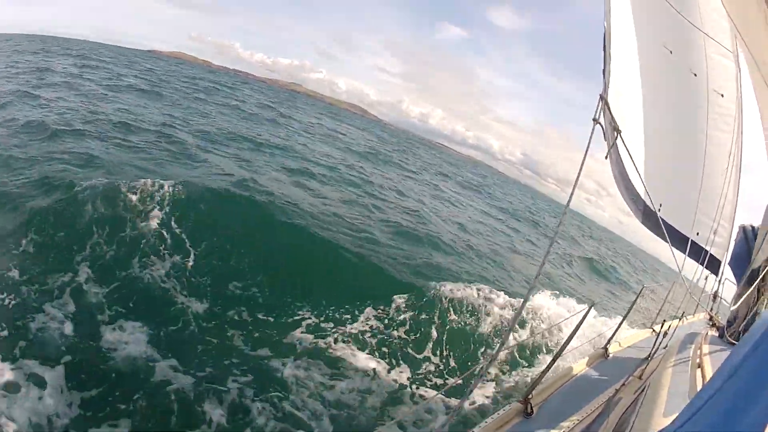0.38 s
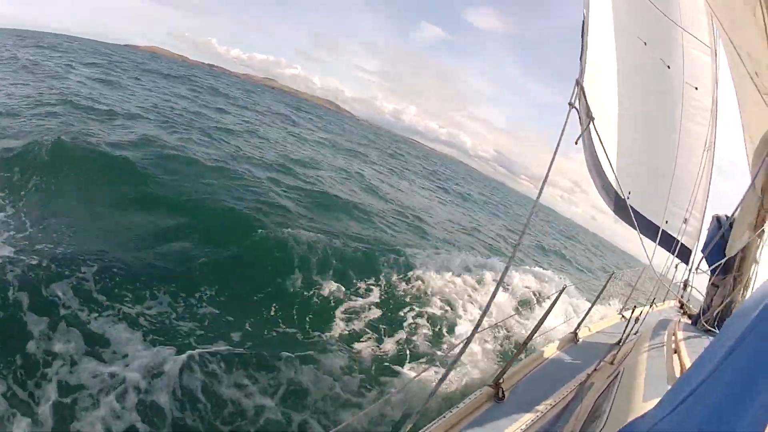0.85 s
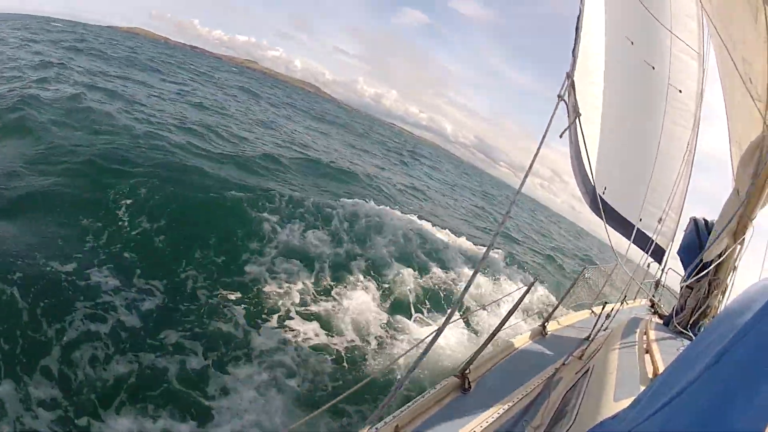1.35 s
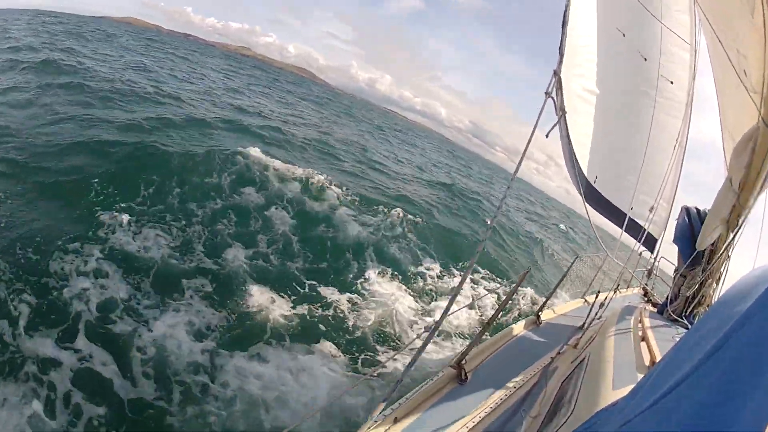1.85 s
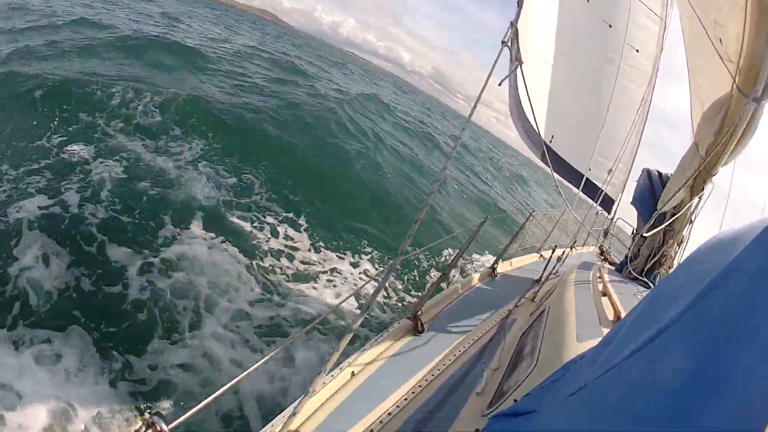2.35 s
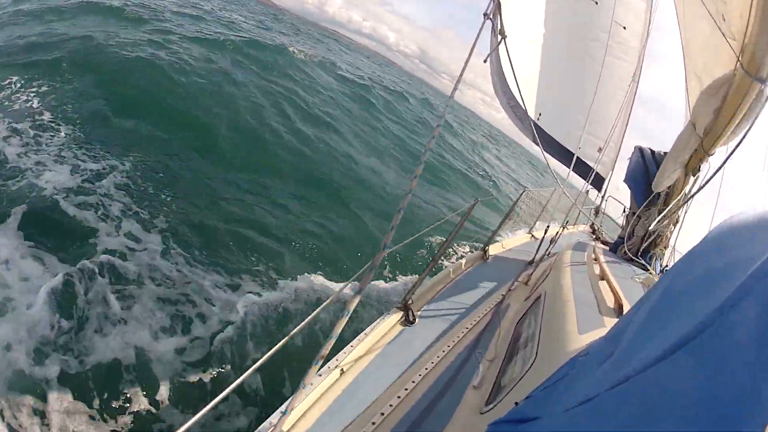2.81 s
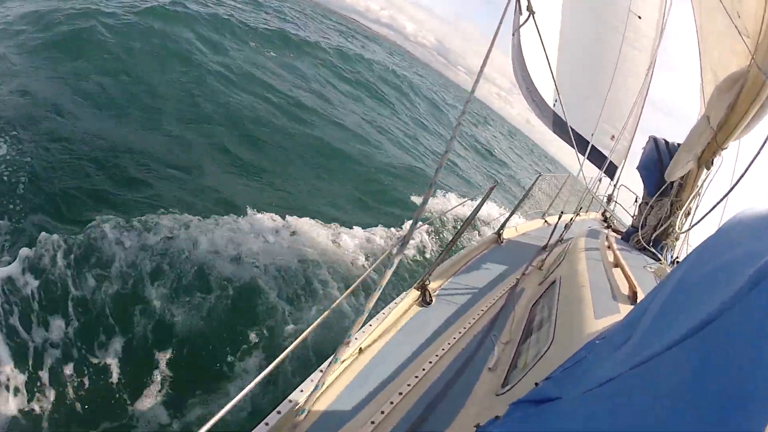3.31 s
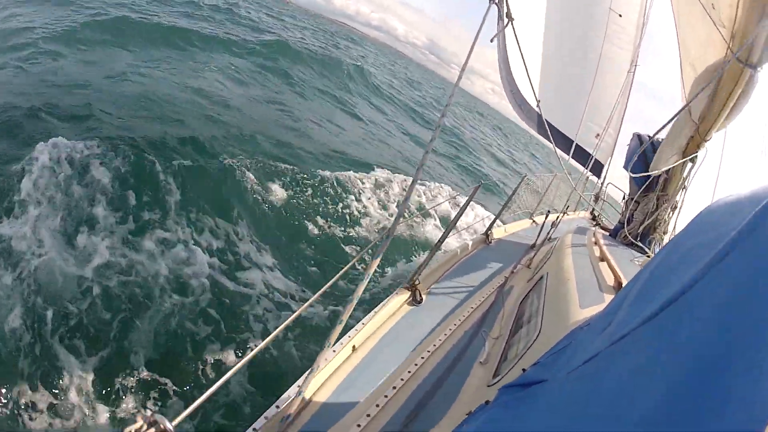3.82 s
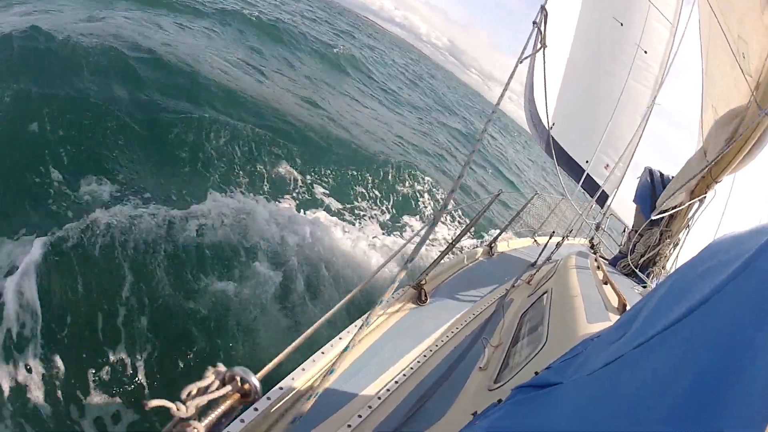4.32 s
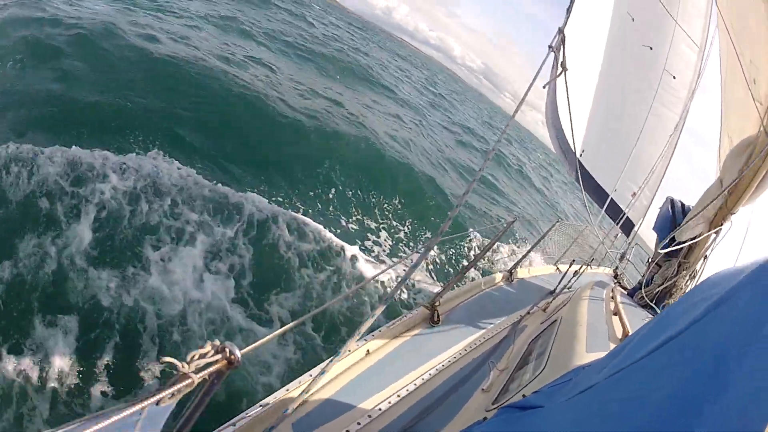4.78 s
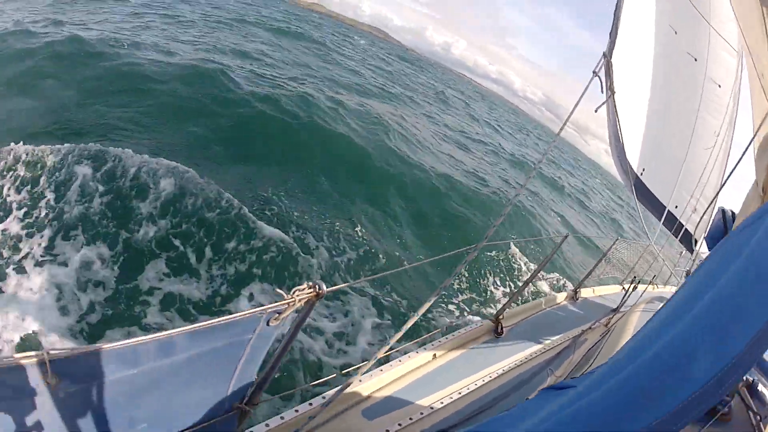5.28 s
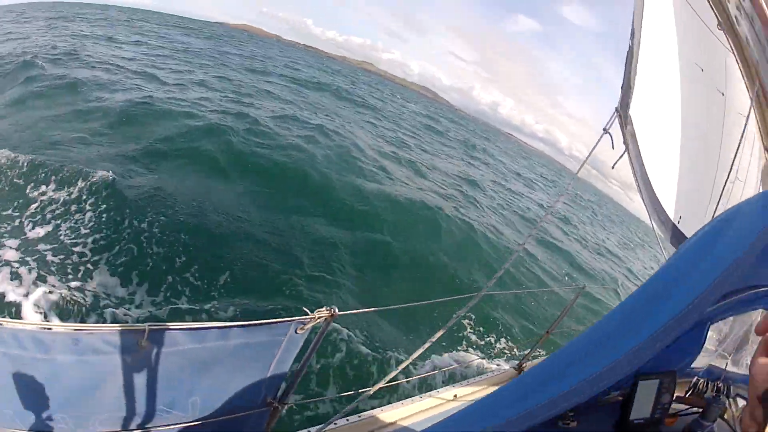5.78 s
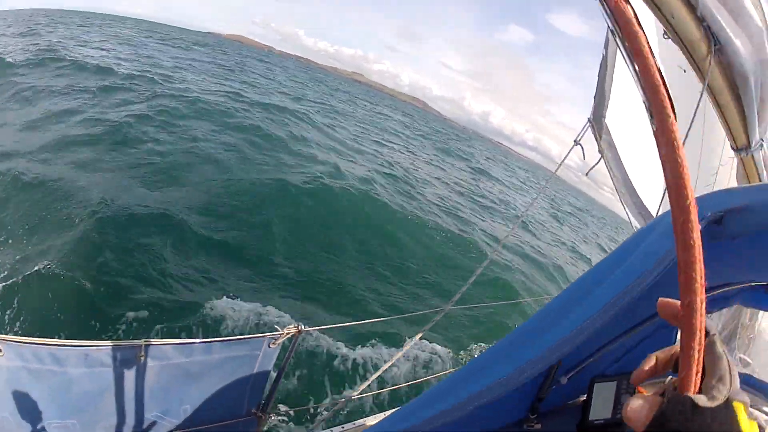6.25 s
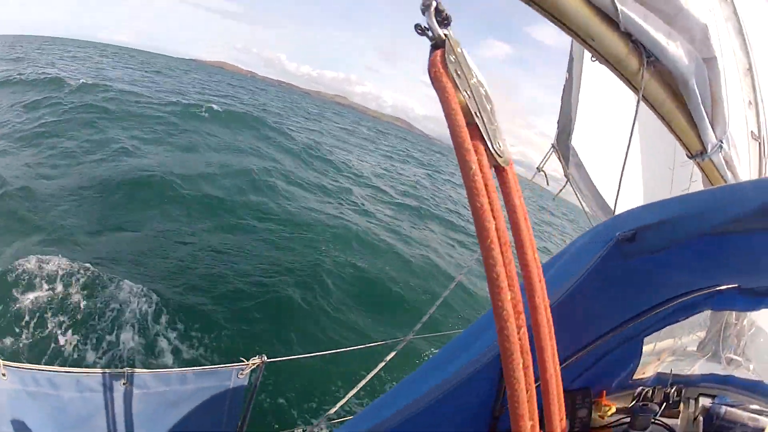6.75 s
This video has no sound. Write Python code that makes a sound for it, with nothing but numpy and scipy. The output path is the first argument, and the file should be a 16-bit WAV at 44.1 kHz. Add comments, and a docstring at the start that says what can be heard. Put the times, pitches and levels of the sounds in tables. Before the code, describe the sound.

Close plastic knocks dominate a dull bed of fizzing water and low wind buffeting beside a moving sailboat. Soft bumps and scraping come first, then two strong clacks, a lull of faint rubbing, a quick clattering run of blows, and sparser single raps, the last ones brighter. The microphone is boxed in, so the sea sounds distant and boxy, with a little gritty treble edge on the knocks.

```python
"""Over the side of a sailboat in choppy water, heard by a hand-held camera in a sealed plastic case.
Foam hisses dully through the case wall and wind buffets it: both are noise shaped in pitch and time.
Fingers and the loose mount rub, and the mount knocks and rattles as the boat pitches: clicks and
blows set the case ringing. Faint narrow streaks of hiss, fuzzy in pitch, come and go.
The converter holds each sample for 1/12000 s, which mirrors the sound about 12 kHz."""
import sys
import numpy as np
from scipy import signal
from scipy.fft import rfft, irfft
from scipy.io import wavfile
from scipy.ndimage import uniform_filter1d

SR = 44100
rng = np.random.default_rng(int(sys.argv[2]) if len(sys.argv) > 2 else 0)


def file_out(sig):
    """Save sig as 16-bit WAV at sys.argv[1]."""
    # one column per channel
    cols = np.atleast_2d(sig).T
    # limit, then scale
    lim = np.clip(cols, -1, 1)
    pcm = np.round(lim * 32767).astype(np.int16)
    wavfile.write(sys.argv[1], SR, pcm)


def how_loud(loudness_db):
    """Turn decibels into a plain amplitude multiplier (0 dB gives 1, 20 dB gives 10)."""
    steps = np.asarray(loudness_db, float) / 20
    return 10 ** steps


N = 303492  # samples, about 6.9 s

# how strongly the foam hisses, before a common lift: [t/s, level/dB]
FOAM_LEVEL = [(0.0, -61.5), (1.07, -58), (1.63, -61.5), (2.01, -61), (2.18, -61), (2.78, -61),
              (3.31, -55.5), (3.54, -59), (3.81, -62), (4.27, -57), (4.52, -59.5), (5.27, -62),
              (6.36, -61.5), (6.48, -59.5), (6.88, -62)]
# colour of the foam through the case wall: [f/Hz, relative level/dB per Hz]
FOAM_COLOUR = [(150, -41), (250, 0.5), (431, -5.5), (526, -21.5), (669, -18.5), (838, -15.5), (1170, -13.5),
               (1530, -20), (1960, -10.5), (2180, -10), (2600, -4.5), (3170, -17), (3480, -11.5),
               (4080, -16.5), (6000, -32.5), (7800, -79), (13200, -120)]
# how strongly the wind buffets the case: [t/s, level/dB]
WIND_LEVEL = [(0.0, -55), (0.17, -52), (0.4, -58), (.75, -55), (1.11, -46.5), (1.48, -48.5), (1.68, -49),
              (1.8, -47.5), (2.24, -49), (2.49, -49.5), (2.74, -49), (3.18, -46.5), (3.41, -57),
              (3.53, -47), (4.06, -49.5), (4.37, -49.5), (4.87, -47), (5.25, -56.5), (5.44, -46),
              (5.7, -56.5), (6.5, -50), (6.88, -56)]
# colour of the buffeting: [f/Hz, relative level/dB per Hz]
WIND_COLOUR = [(15, -3.5), (35, 3.5), (60, -10.5), (120, -10), (300, -32), (450, -24), (700, -66),
               (1500, -46)]
# fingers and mount rubbing on the case: [t/s, wall level/dB]; the body follows
GRIP_LEVEL = [(0.0, -71.5), (.3, -64), (.65, -63), (.95, -64.5), (1.3, -54.5), (1.57, -68), (1.8, -60),
              (2.1, -64), (2.64, -67), (3.13, -63.5), (3.4, -66), (4.0, -67), (4.35, -63.5), (4.9, -66),
              (5.15, -70), (5.8, -68), (6.42, -65), (6.88, -68)]
# longer scrapes: [start t/s, end t/s]
SCRAPE_TIMES = [(.56, .8), (.985, 1.205), (1.7, 2.4), (4.55, 4.95)]
# strength of those scrapes, in the same order: [wall level/dB, body level/dB]
SCRAPE_LEVELS = [(-75, -52), (-53.5, -57), (-87, -67), (-78, -63.5)]
# ways the case rings, in groups: body, wall, lid, crack, side, shove on the arm, snap
# [f/Hz, level within the group/dB, time to fall by 60 dB/s, first swing +1 or -1]
CASE_MODES = [
    [(172, 0, .055, 1), (270, -14, .02, -1)],
    [(535, 0, .04, -1)],
    [(925, -6, .028, 1), (1175, 0, .024, 1), (780, -9, .012, 1)],
    [(1570, -12, .012, -1), (2250, 0, .014, -1), (2650, 0, .012, -1)],
    [(320, -3, .022, 1), (455, 0, .035, 1)],
    [(50, -3, .1, -1), (85, 0, .07, 1)],
    [(3150, -11, .007, 1), (3620, 0, .011, -1), (4050, -1, .010, -1)],
]
# knocks on the case: [t/s, blow level/dB, hardness (0 thud, 1 rap),
# mount chatter against the blow/dB, shove against the blow/dB]
BLOWS = [(0.099, -42.5, 0.45, -9, -15), (0.318, -55.5, 1.2, 13, -14), (0.554, -38, 0, -34, 2.5),
         (0.591, -40, 0.11, -30, -8), (0.608, -36, 0.28, -31, -27), (0.633, -30, 0.059, -30, -15),
         (0.699, -43, .2, -23, -16), (0.714, -39, .2, -20, -14), (0.744, -40, 0.41, -23, -16),
         (0.763, -45, .4, -14, -5), (0.986, -33.5, 0.29, -23, -4), (1.135, -25.5, 0.15, -11, -12),
         (1.313, -11, 1, -0.5, -7), (1.465, -15.5, 0.51, -38, -20), (1.477, -15.5, 0.51, -21, -7.5),
         (2.247, -39.5, 0, -20, -10), (2.361, -34, 0, -31, -13), (2.692, -41.5, 0.64, -14, -5),
         (2.801, -38, 0, -17, -20), (2.941, -20, 0.44, -25, -21), (2.967, -22, 0.48, -36, -10.5),
         (3.149, -15, 0.92, -11, -14), (3.18, -28.5, 0.37, -25, -14), (3.209, -19, .55, -30, -22),
         (3.231, -21, 0.77, -16, -30), (3.253, -16.5, .5, -18, -36), (3.279, -22.5, 0.44, -28, -22),
         (3.3, -15.5, .5, -20, -9), (3.314, -17, .5, -33, -14), (3.329, -20, 0.81, -22, -15),
         (4.183, -16, 0.58, -11.5, -10.5), (4.859, -35.5, 0.44, -22, -8), (4.913, -42, 0.77, -19, -0.5),
         (5.27, -48, 1.4, 16.5, -2), (5.398, -18.5, 0.97, -5.5, -4.5), (5.451, -29, 0.62, -13, -14),
         (5.482, -30.5, 0.37, -12.5, -15), (6.221, -41.5, .1, -19, -11), (6.373, -45.5, 0.46, -16, -11),
         (6.456, -19, 1.37, 8, -4.5), (6.567, -39.5, 0.44, -9, -2)]
# harder blows reach higher modes: [hardness, then against the blow: wall/dB, lid/dB, side/dB]
HARDNESS_REACH = [(0, -34, -32, -18), (.3, -15.5, -19.5, -14), (.5, -8.5, -13.5, -6.5),
                  (.8, -5.5, -9.5, -4), (1.2, -3.5, 5, 9.5)]
# faint narrow streaks of hiss, fuzzy in pitch: [start t/s, end t/s, f/Hz, level/dB]
STREAK_LIST = [(2.054, 2.135, 2440, -61), (2.248, 2.335, 2400, -62), (2.338, 2.41, 2700, -62),
               (2.394, 2.64, 3600, -70), (2.5, 2.623, 2480, -72), (3.673, 3.956, 3540, -68.5),
               (5.014, 5.11, 2330, -66), (5.5, 6.0, 2624, -74), (6.665, 6.87, 2636, -62)]


def evened(x):
    """Scales a signal to an average strength (rms) of 1."""
    return x / np.sqrt(np.mean(x ** 2) + 1e-20)


def curve(rows):
    """Draws straight lines between the (time, value) points of a table."""
    times, values = np.transpose(rows)
    return np.interp(np.arange(N) / SR, times, values)


def smoothed_field(field, bins, frames):
    """Blurs a random field over pitch and time, then evens its strength."""
    over_pitch = uniform_filter1d(field, size=bins, axis=0)
    return evened(uniform_filter1d(over_pitch, size=frames, axis=1))


def noise(spectrum, size, patchy_db, swell_db, flicker_db):
    """Random short-time spectra with brief patches, long narrow swells and a flicker shared by all bins."""
    frames = 4 * N // size + 5
    hz = np.fft.rfftfreq(size, 1 / SR)
    real, imaginary, patches, swells = rng.standard_normal((frames, len(hz), 4)).T
    swells = smoothed_field(swells, bins=4, frames=40)
    patches = smoothed_field(patches, bins=5, frames=9)
    flicker = evened(uniform_filter1d(rng.standard_normal(frames), size=3))
    table_hz, table_db = np.transpose(spectrum)
    colour_db = np.interp(np.log(hz + 1), np.log(table_hz + 1), table_db)[:, None]
    field_db = colour_db + patchy_db * patches + swell_db * swells + flicker_db * flicker
    spectra = (real + 1j * imaginary) * how_loud(field_db)
    sound = signal.istft(spectra, nperseg=size, noverlap=3 * size // 4)[1]
    return evened(sound[:N])


def foam():
    """Dense fizz of bursting bubbles, coloured by the case; narrow bands swell as foam slides past."""
    lift_db = 2.5
    fizz = noise(FOAM_COLOUR, size=1024, patchy_db=0.55, swell_db=2.27, flicker_db=0.85)
    return how_loud(curve(FOAM_LEVEL) + lift_db) * fizz


def wind():
    """Lumpy low pressure of moving air on the case."""
    buffeting = noise(WIND_COLOUR, size=2048, patchy_db=1.0, swell_db=1.0, flicker_db=0.5)
    return how_loud(curve(WIND_LEVEL)) * buffeting


def ring(modes):
    """A struck group of modes: sine waves that die away, added up and scaled to a peak of 1."""
    t = np.arange(SR // 5) / SR
    sound = np.zeros(len(t))
    for hz, db, t60, sign in modes:
        sound += sign * how_loud(db - 60 * t / t60) * np.sin(2 * np.pi * hz * t)
    return sound / abs(sound).max()


def rub():
    """Uneven stick-slip clicks shake the body, wall and lid modes."""
    clicks_per_s = np.array([[300], [1500]])  # body, wall; on average
    lid_db, body_over_wall_db, scrape_edge_s = -4.5, -0.5, .015
    slips = rng.standard_normal((2, N)) * (rng.random((2, N)) < clicks_per_s / SR)
    wall_and_lid = ring(CASE_MODES[1]) + how_loud(lid_db) * ring(CASE_MODES[2])
    body = evened(signal.oaconvolve(slips[0], ring(CASE_MODES[0]))[:N])
    wall = evened(signal.oaconvolve(slips[1], wall_and_lid)[:N])
    t = np.arange(N) / SR
    wall_level = how_loud(curve(GRIP_LEVEL))
    body_level = how_loud(body_over_wall_db) * wall_level
    for (start, end), (wall_db, body_db) in zip(SCRAPE_TIMES, SCRAPE_LEVELS):
        scraping = np.clip(np.minimum(t - start, end - t) / scrape_edge_s, 0, 1)
        wall_level += how_loud(wall_db) * scraping
        body_level += how_loud(body_db) * scraping
    return wall_level * wall + body_level * body


def mount_chatter():
    """The loose mount rattles for a few ms at each blow: a short random burst of force, total energy 1."""
    t = np.arange(SR // 100) / SR
    bursts = rng.standard_normal((len(BLOWS), len(t))) * t * np.exp(-t / .0006)
    return bursts / np.linalg.norm(bursts, axis=1, keepdims=True)


def knocks():
    """Each blow strikes all mode groups; the mount's chatter sounds the crack and snap modes."""
    turn_s = 5.1  # the camera swings round and blows then land on its side
    facing_db = -43.5  # the side modes before that, against the blow
    contacts_s = .0007, .001, .0005, .0002, .001, .003, .00019  # rough push length for each group
    low_cut_hz = 95
    out = np.zeros((len(CASE_MODES), N))
    chatter = mount_chatter()
    hardness, *reach = np.transpose(HARDNESS_REACH)
    for group, contact_s in enumerate(contacts_s):
        forces = np.zeros(N)
        for (s, blow_db, hard, crack, shove), rattle in zip(BLOWS, chatter):
            wall, lid, side = (np.interp(hard, hardness, db) for db in reach)
            side = side if s > turn_s else facing_db
            snap = crack + .5 * min(crack, 0) - 1.5  # soft chatter loses the snap first
            share_db = (0, wall, lid, crack, side, shove, snap)[group]
            force = rattle if group in (3, 6) else np.ones(1)  # crack and snap
            forces[round(s * SR):][:len(force)] += how_loud(blow_db + share_db) * force
        push = np.hanning(round(contact_s * SR) + 3)
        struck = np.convolve(ring(CASE_MODES[group]), push / push.sum())
        out[group] = signal.oaconvolve(forces, struck)[:N]
    shove = out[5]  # it moves the whole camera and is felt in full
    rest = out.sum(axis=0) - shove
    # the knocks lose their slowest pressure, so the rebound swings wider than the first push
    return shove + signal.lfilter(*signal.butter(2, low_cut_hz, "high", fs=SR), rest)


def streaks():
    """Each streak is a narrow band of noise that fades in and out."""
    out = np.zeros(N)
    for start, end, hz, db in STREAK_LIST:
        t = np.arange(round((end - start) * SR)) / SR
        waver = rng.standard_normal((2, SR))
        for _ in range(2):  # smoothed twice, so the streak wavers slowly
            waver = uniform_filter1d(waver, size=500)
        sine, cosine = np.sin(2 * np.pi * hz * t), np.cos(2 * np.pi * hz * t)
        band = waver[0, :len(t)] * sine + waver[1, :len(t)] * cosine
        fade = signal.windows.tukey(len(t), .5)
        out[round(start * SR):][:len(t)] += how_loud(db) * evened(band) * fade
    return out


def scene():
    """Adds up all the sounds, as one channel."""
    return (foam() + wind() + rub() + knocks() + streaks())[None]


def roll_off(x):
    """The treble ends steeply here."""
    return signal.sosfilt(signal.butter(12, 16450, fs=SR, output="sos"), x)


def record(dry):
    """Sampling at 12 kHz copies the band around 12 kHz; holding each sample weighs all by a sinc."""
    hold_hz = 12000
    hz = np.fft.rfftfreq(N, 1 / SR)
    band = signal.sosfilt(signal.butter(8, 5600, fs=SR, output="sos"), dry)  # low-pass, Hz
    sampled = band * (1 + 2 * np.cos(2 * np.pi * hold_hz * np.arange(N) / SR))
    # the resampler's roll-off: 1 dB per 60 Hz above 14800 Hz, nothing from 16450 Hz
    edge = how_loud(-np.clip(hz - 14800, 0, None) / 60) * (hz < 16450)
    held = irfft(rfft(sampled) * np.sinc(hz / hold_hz) * edge, N)
    return roll_off(held)


dry = scene()
out = record(dry)
file_out(out)
```